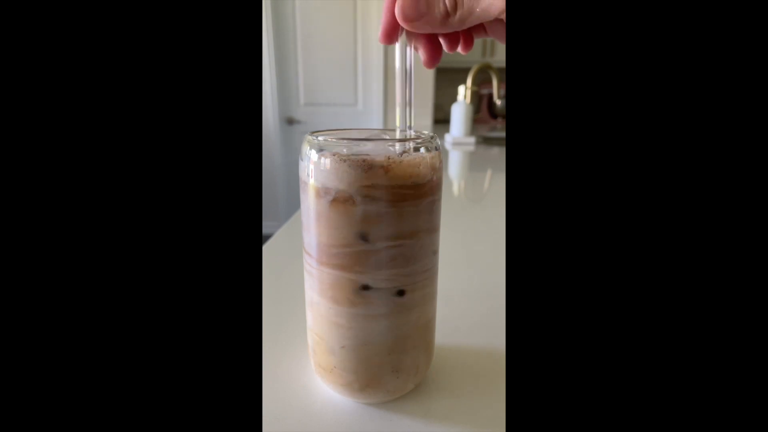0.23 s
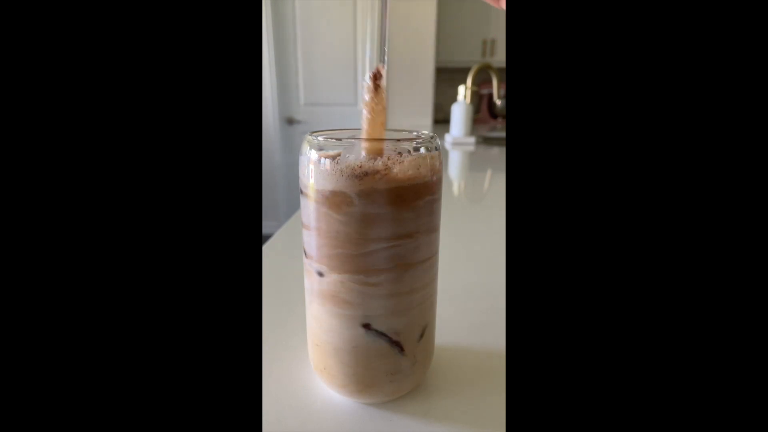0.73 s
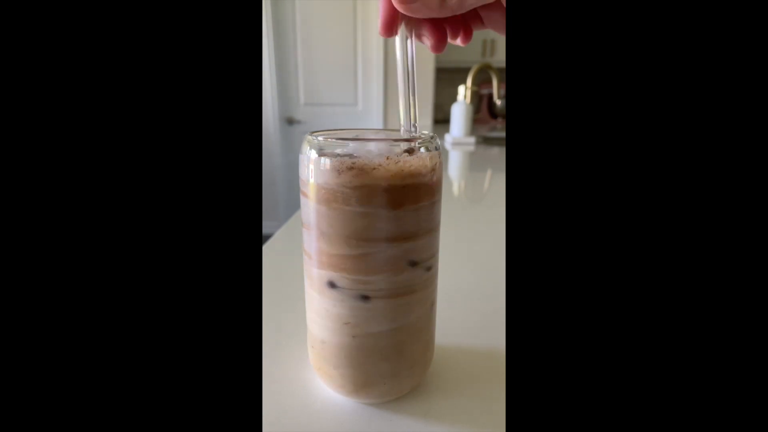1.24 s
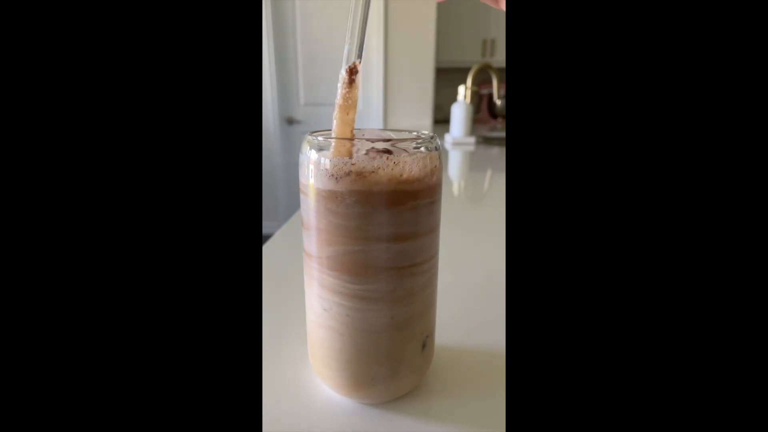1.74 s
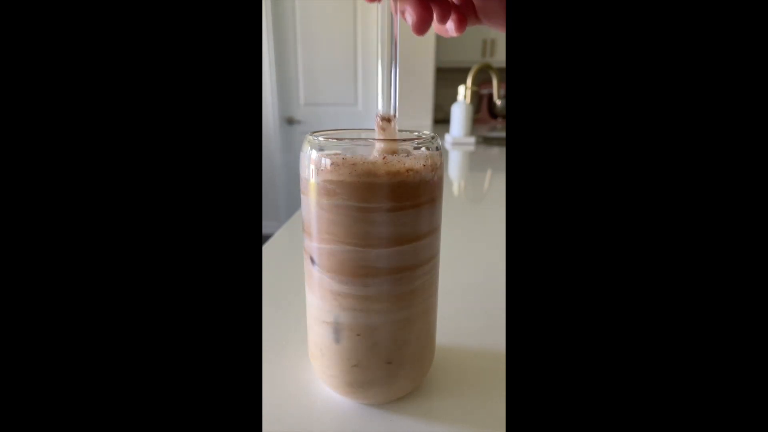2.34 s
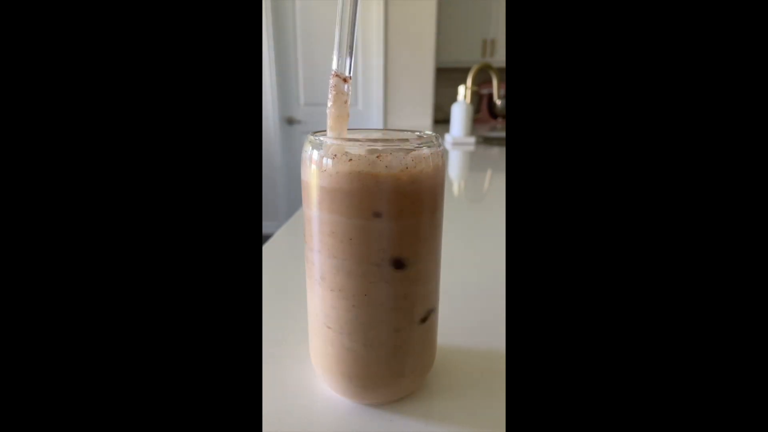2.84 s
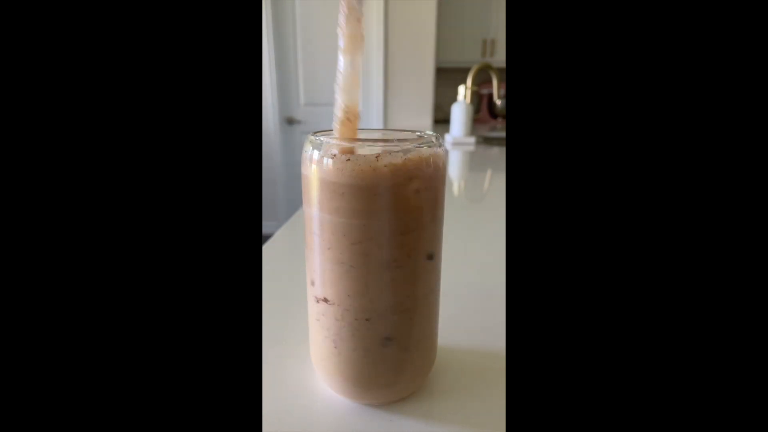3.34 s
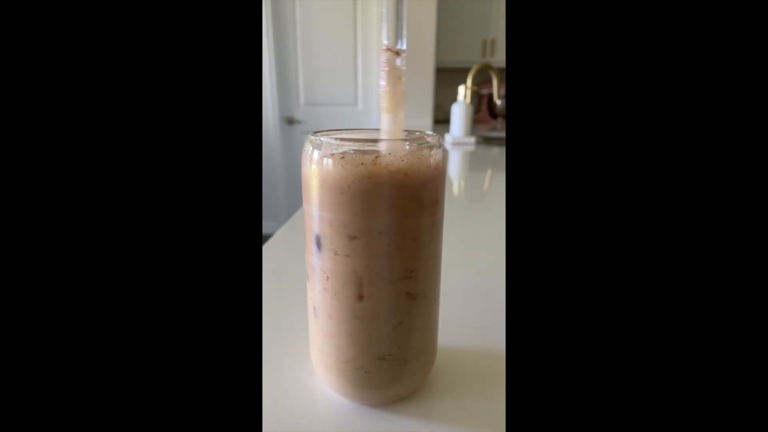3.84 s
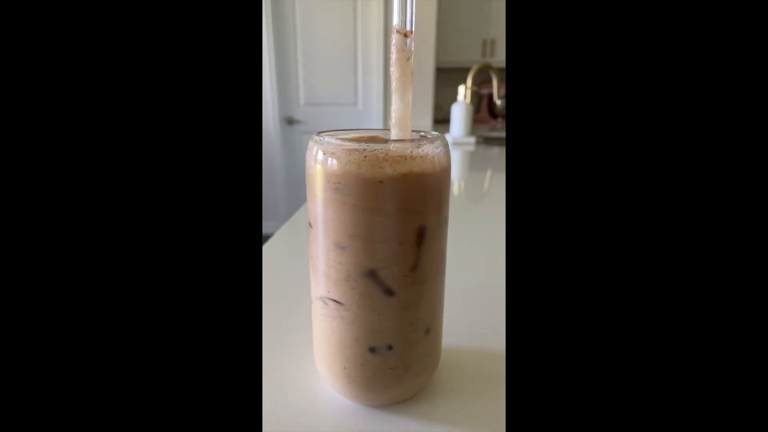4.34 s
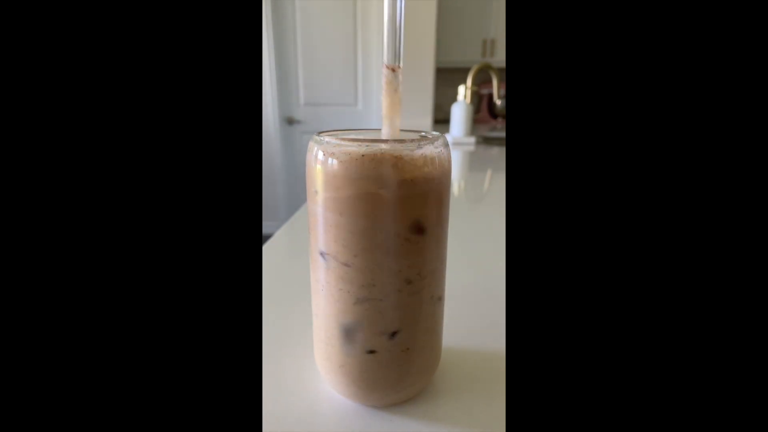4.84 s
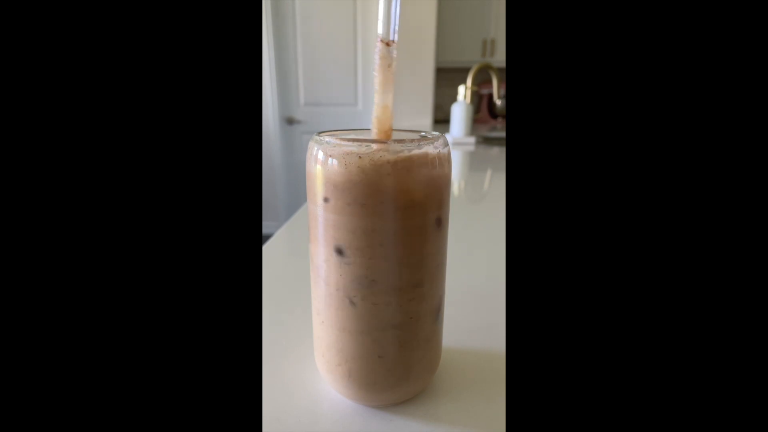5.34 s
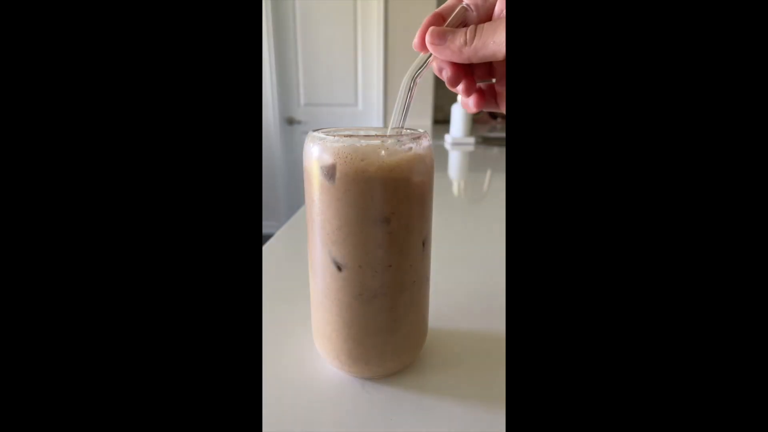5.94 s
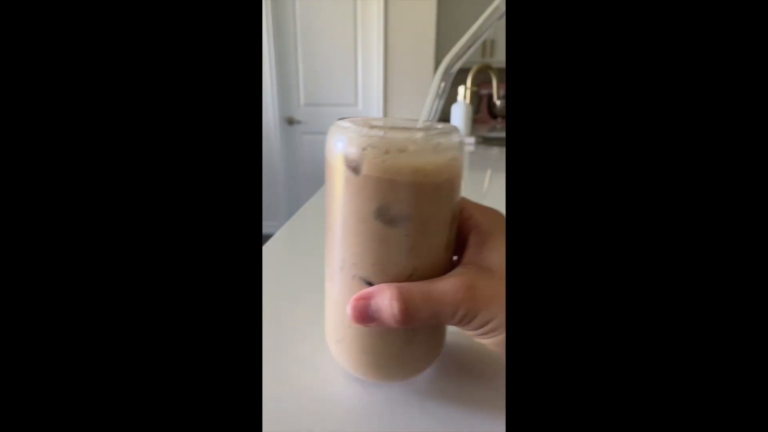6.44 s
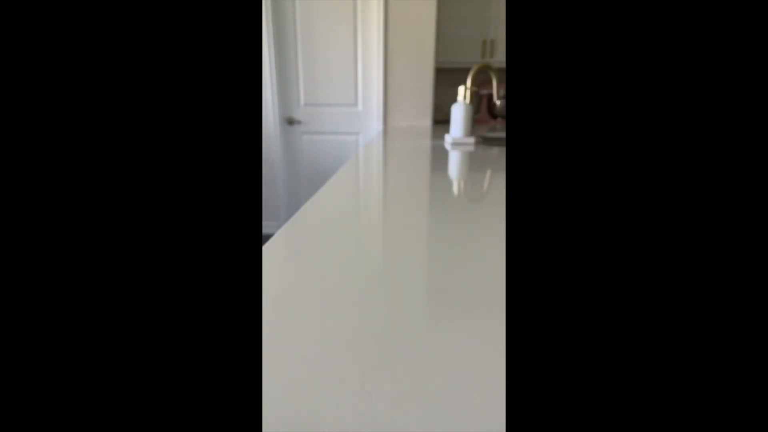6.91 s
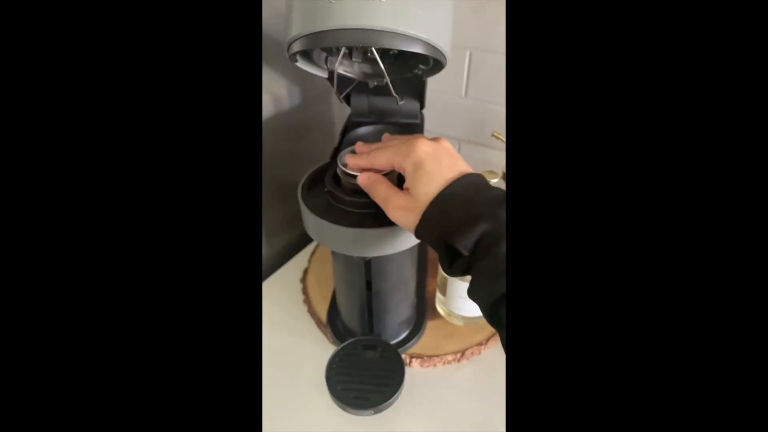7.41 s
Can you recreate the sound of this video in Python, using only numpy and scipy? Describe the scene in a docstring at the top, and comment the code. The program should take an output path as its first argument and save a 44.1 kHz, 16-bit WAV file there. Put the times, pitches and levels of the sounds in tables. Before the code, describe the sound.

Ice cubes clink busily in a full glass of iced coffee as a glass straw stirs, ending in a sharp clatter and thud, then small plastic clicks.

```python
"""Iced coffee stirred, then a capsule pressed

Close by, a glass straw stirs ice in a full glass on a stone counter, drops with a thud, and a hand lifts
the glass away. Foam and drink damp the knocks: short decaying modes, with clicks for light touches, and
brief rising tones for gulping air and for the thud. The hard kitchen behind answers with an echo of dying
noise, over a low appliance hum in filtered noise. After a silent cut a capsule is slid and pressed into a
coffee machine, heard in mono: clicks ring its hollow and rim, and a low sine is the thud of the housing."""
import sys
import numpy as np
from scipy import signal
from scipy.fft import rfft, irfft, next_fast_len
from scipy.io import wavfile
from scipy.ndimage import uniform_filter1d

SR = 44100
rng = np.random.default_rng(int(sys.argv[2]) if len(sys.argv) > 2 else 0)


def unload_audio(sound):
    """Save the sound as a 16-bit wav file, at the path given as the first command line argument."""
    columns = np.transpose(np.atleast_2d(sound))
    # keep every value between -1 and 1, then stretch to whole-number steps
    steps = np.round(np.clip(columns, -1, 1) * 32767)
    wavfile.write(sys.argv[1], SR, steps.astype(np.int16))


N = 338247

# Blows on the glass: t/s, level/dB, wall ring f/Hz, ice knock over wall ring/dB, clack over wall ring/dB
BLOWS = [(0.0748, -48, 2060, 3, -7), (0.0864, -31.5, 2440, -8.5, -0.5), (0.114, -46.5, 1940, 11, -13),
         (0.157, -52.5, 1880, 17.5, -18), (0.2425, -46, 2180, -7, -21), (0.2661, -23.5, 2050, -9.5, 2),
         (0.2723, -30.5, 2160, -7, -2.5), (0.2969, -27, 2360, -4, -5.5), (0.3179, -39, 1900, 10.5, -10),
         (0.3321, -31.5, 2150, 2, -3.5), (0.3397, -39.5, 1960, 0.5, -1.5), (0.3732, -39, 1810, 7, -8),
         (0.4979, -47.5, 2270, 6.5, -19), (0.5498, -48.5, 2130, 3.5, -13), (0.6747, -42, 2230, -1, -14),
         (0.7868, -47, 1910, 2, 3), (0.8514, -39.5, 1700, -2.5, -7), (0.859, -28.5, 2050, -12, -6),
         (0.8937, -36, 2270, -11, -8), (0.942, -37.5, 2180, -4, -14.5), (0.9599, -41, 1970, 5, -14),
         (1.0885, -37.5, 2220, -13, -14.5), (1.1336, -43.5, 2180, -2, 4), (1.1403, -52, 1850, 2.5, -9),
         (1.1576, -39.5, 2250, -22, -8), (1.2582, -34.5, 2380, -6, -12.5), (1.3296, -37.5, 2050, 7, -2.5),
         (1.34, -43.5, 2090, 7, -19), (1.5525, -49, 2050, -13, -31), (1.6379, -44, 2100, -9, -5.5),
         (1.6449, -36.5, 1920, -10, -8), (1.749, -46.5, 1720, -25, -27), (1.787, -55, 1830, -5, -16),
         (1.8216, -55, 1780, 12.5, -19), (1.9138, -49.5, 2260, 4.5, -21), (1.946, -52, 1890, 8, -12),
         (1.9578, -46.5, 2330, 3, 1), (1.9698, -48, 2160, -8, -16), (2.0845, -47, 1780, 4, -5),
         (2.0974, -47.5, 2160, 0, -3), (2.1441, -56.5, 1810, 8, 0), (2.2123, -54.5, 1900, 5.5, -5),
         (2.255, -61.5, 2400, -12.5, -10), (2.3735, -44.5, 1620, -12, -20), (2.4433, -40, 2140, -13, -16.5),
         (2.5216, -45, 2080, -6, 0.5), (2.5631, -51, 1830, 4, -2), (2.5953, -45.5, 2260, -8, -13),
         (2.7502, -46.5, 1920, 9.5, -7), (2.7996, -39, 2280, -3.5, -1), (2.8045, -36, 2150, -6, -7.5),
         (2.8407, -40.5, 1915, -6, -13), (3.0376, -33, 1830, -7, -6), (3.0879, -36, 1948, -2, -9.5),
         (3.118, -37, 1955, -4.5, -9), (3.1237, -43.5, 1848, -0.5, -17.5), (3.2209, -38, 2086, -5.5, -24.5),
         (3.2492, -40, 2090, 1.5, -3), (3.298, -42, 1908, 10, -7), (3.3502, -36, 2320, -5.5, 1.5),
         (3.3678, -14.5, 1930, -15.5, 0), (3.3832, -27.5, 2001, -6.5, -5.5),
         (3.5765, -13.5, 2237, -35.5, -10), (3.6347, -30, 2160, -15.5, -9),
         (3.6479, -22.5, 2238, -10.5, -8.5), (3.6817, -33, 1990, 2, -17), (3.6919, -30, 2070, -4.5, -12),
         (3.7322, -36.5, 1990, 3, -17), (3.7414, -44, 1940, 14, -14), (3.8146, -33, 2004, -15, -8),
         (3.8782, -28, 2000, -5.5, 0.5), (3.898, -32.5, 2040, -6, -2.5), (3.9231, -37.5, 2340, -8, -7),
         (3.9635, -20.5, 2005, -28, -7), (3.9765, -36.5, 1963, -14.5, 0), (4.1046, -22.5, 2183, -5.5, -15),
         (4.1252, -25.5, 1702, -1, -17), (4.1313, -31, 2025, 8.5, -18.5), (4.1853, -36, 2047, 2, -15.5),
         (4.2156, -36.5, 2310, -3.5, -7), (4.2303, -38.5, 2160, -1, -1), (4.3402, -34, 2160, -8, -8),
         (4.3738, -36, 2110, -10, -6.5), (4.4143, -33.5, 2404, -9, -8), (4.4778, -28.5, 2190, -15.5, 2),
         (4.5076, -32, 2230, -4.5, -14.5), (4.5298, -35.5, 2130, -2, -6), (4.548, -25, 1925, -5.5, -17.5),
         (4.6094, -16.5, 1986, -26.5, 3), (4.6226, -28, 2050, -34, -35), (4.6637, -26, 2350, -19.5, -27),
         (4.8168, -29, 2360, -6, -1.5), (4.8353, -36.5, 2030, -7, 2.5), (4.8697, -40, 2070, -0.5, -12),
         (4.9273, -31.5, 2140, -6, -17.5), (4.9721, -38.5, 2210, -0.5, -5),
         (5.0528, -30.5, 2070, -12, -15.5), (5.1239, -34.5, 1980, -2, -5), (5.1602, -32.5, 2010, 3.5, 9.5),
         (5.1667, -37, 2050, -5, 3), (5.1762, -39, 1990, 6.5, -1), (5.2751, -47.5, 2210, -8.5, 12),
         (5.347, -43.5, 2140, -3.5, -10), (5.4003, -32.5, 1887, 5, -6), (5.4142, -16.5, 2155, -23, -5.5),
         (5.4207, -29.5, 2048, -6, -2.5), (5.47, -16.5, 2040, -9, -15.5), (5.5298, -17, 1800, -9.5, -10.5),
         (5.5387, -25.5, 2133, -15, -22), (5.5544, -8, 2010, -10.5, -7), (5.558, -11.5, 2170, -18.5, -8),
         (5.561, -15, 2150, -14, -10), (5.5703, -18, 2180, -14, -12), (5.5744, -17.5, 2254, -13, -11.5),
         (5.5987, -18.5, 2270, -15.5, -2), (5.6044, -25.5, 2130, -16, -4), (5.6078, -32, 2220, -15.5, 8),
         (5.611, -19, 2190, -8.5, -11), (5.614, -21, 2125, -11.5, -12), (5.622, -32, 2120, -5.5, -6),
         (5.669, -31.5, 2300, -7.5, -9), (5.6892, -29, 2210, -6.5, 7), (5.6927, -17.5, 2365, -6.5, -8),
         (5.6972, -23, 2075, -5, -3), (5.7125, -20, 2120, 4.5, 6.5), (5.7567, -28, 2160, -5, -8.5),
         (5.77, -31, 2020, 2.5, 11.5), (5.7759, -13, 2217, -19, -0.5), (5.8608, -32, 1924, -5.5, -28),
         (5.8759, -36, 1975, 1, -19), (5.9797, -30.5, 2240, 0, -24), (6.0349, -37.5, 1940, -5, -22),
         (6.1174, -35.5, 2090, -8.5, -20), (6.351, -45, 2050, 12.5, -26), (6.4119, -45, 2150, 1.5, -29.5),
         (6.4953, -46.5, 2070, 1, -7.5), (6.7166, -47.5, 2050, 1, -0.5)]
# Modes of the full glass, low knock, middle clack and high glint: f/Hz, relative level/dB, t60/s
KNOCK_MODES = [(345, -25.5, 0.024), (525, -19, 0.017), (740, -14.5, 0.019), (1008, -5.5, 0.0075),
               (1230, -4, 0.0034)]
CLACK_MODES = [(2926, -8, 0.0094), (3670, -8, 0.0098), (4080, -11.5, 0.0086), (5090, -11, 0.013),
               (5310, -6.5, 0.0064), (6270, -9.5, 0.0041)]
GLINT_MODES = [(9300, -3.5, 0.0053), (9230, -5.5, 0.0037), (11050, -8.5, 0.0046), (12400, -8, 0.017)]
WALL_T60_S, MODE_SCATTER_DB, DETUNE = 0.0053, 3, 0.069  # DETUNE is a fraction of the mode's pitch
# Swell of a hard blow, and dB of longer contact per dB of ice knock
CONTACT_S, SOFTENING = .0007, .55
# The echo is fed a broad crack: modes cut short, and a snap
CRACK_T60_S, CRACK_DB, SNAP_DB = .0016, 10, -2
# Glint over the clack at a firm blow, its rise in dB per dB of force, and its chance
GLINT_DB, GLINT_PER_DB, FIRM_BLOW_DB, GLINT_SCATTER_DB = -14.5, 0.3347, -32, 0.5

# Stirring, then the glass carried off: t/s, ice jostling level/dB, drink slosh level/dB
STIR = [(0.0, -79, -72.5), (0.32, -66, -53.5), (0.65, -72, -67.5), (1.04, -69, -66), (2.51, -76, -68),
        (2.65, -62, -72.5), (3.11, -66, -73), (3.28, -59, -71), (3.82, -58.5, -68), (3.94, -65.5, -69),
        (4.44, -55.5, -65.5), (4.61, -66, -66), (5.17, -62.5, -69), (5.46, -60, -68.5), (5.62, -40, -61.5),
        (5.72, -52, -53.5), (5.98, -55.5, -61.5), (6.13, -59.5, -60)]
LIFT = [(6.16, -95, -79), (6.6, -93, -75), (6.892, -93, -79), (6.92, -93, -79)]
# Cubes tumbling in a dense rattle: t/s, length/s, level/dB
RATTLES = [(0.104, 0.022, -56), (0.142, 0.024, -53), (0.294, .1, -60), (0.367, 0.022, -53.5),
           (0.895, 0.0096, -53), (1.1, 0.016, -53), (1.135, .015, -49), (1.312, 0.074, -52.5),
           (1.85, 0.024, -63.5), (2.063, .015, -59.5), (2.086, 0.027, -57), (2.141, 0.047, -60),
           (2.201, 0.034, -65), (2.553, 0.065, -54), (2.792, 0.021, -52), (3.375, 0.023, -40),
           (3.878, 0.036, -39.5), (4.1, 0.038, -35.5), (4.536, 0.036, -41), (5.404, 0.027, -41.5),
           (5.463, 0.023, -47.5), (5.558, .012, -26), (5.568, 0.019, -32.5), (5.595, 0.043, -33),
           (5.705, 0.022, -31.5), (5.754, 0.055, -26.5), (6.33, 0.097, -61)]
# Air pockets gulping in the drink; the two near 344 Hz at 5.7-5.8 s are the thud of the dropped straw:
# t/s, level/dB, starting f/Hz
GULPS_AND_STRAW_THUD = [(0.085, -34, 490), (0.265, -45, 630), (0.363, -34.5, 404), (0.519, -37.5, 430),
                        (1.32, -32.5, 475), (2.07, -48, 450), (2.2, -50, 400), (2.318, -50, 338),
                        (3.295, -39, 674), (3.366, -37, 600), (3.69, -36, 398), (3.876, -43, 395),
                        (4.103, -40, 630), (4.606, -30, 637), (4.815, -44, 600), (4.941, -40.5, 410),
                        (5.398, -39, 505), (5.47, -31, 560), (5.532, -33, 640), (5.708, -17, 343),
                        (5.761, -27, 345), (5.999, -31.5, 633)]
JOSTLES_PER_S, TUMBLES_PER_S, GURGLES_PER_S = 600, 1500, 200
# Cycles, at the starting pitch, in which a gurgle, or a gulp or thud, dies by 60 dB; its phase bend
GURGLE_CYCLES, GULP_CYCLES, GULP_RISE = 7, 13, 0.19
SURGES_PER_S, JOSTLE_SURGE_DB, SLOSH_SURGE_DB = 14, 2.5, 1.5  # ice and drink move in fits and starts
# Each blow shakes the cubes: level against the blow, dying time, delay
JOLT_DB, JOLT_T60_S, JOLT_DELAY_S = -25, 0.068, 0.0035

# Capsule scrapes and crunches: t/s, length/s, relative level/dB, rim clicks over hollow clicks/dB
CAPSULE = [(7.27, 0.073, -62, -6), (7.283, 0.039, -47.5, -10), (7.302, 0.16, -62, 0.5),
           (7.374, 0.018, -49.5, 11.5), (7.382, 0.072, -49, -19), (7.448, 0.0096, -34, 12.5),
           (7.456, 0.083, -60, -5)]
# Capsule knocks into its seat: t/s, relative level/dB
SEATING = [(7.3762, -32), (7.379, -15), (7.385, -24)]
# Modes of the hollow capsule, then of its hard rim: f/Hz, relative level/dB, t60/s
HOLLOW_MODES = [(334, -32, 0.0092), (503, -20, 0.0062), (1150, -45, 0.031), (1320, 1.5, 0.015),
                (1720, 0, 0.0085)]
RIM_MODES = [(2700, -3, .005), (3600, 0, .006), (4300, -2, .005), (5400, -6, .004), (6600, -8, .004),
             (8000, -12, .004)]
# Housing thuds: t/s, level/dB, t60/s
THUDS = [(7.384, -44.5, 0.49), (7.412, -41, 0.14), (7.456, -28.5, 0.092), (7.505, -38, 0.09)]
THUD_HZ = 69.2

# Echo of the kitchen, then of the nook around the machine: f/Hz, relative level/dB, t60/s
KITCHEN = [(205, -16, 0.37), (570, -22, 0.62), (1440, -20.5, 0.22), (3180, -29, 0.45), (6000, -28.5, 0.21),
           (6760, -47.5, 0.66), (8300, -40, .4), (8800, -36, .35), (11000, -27.5, 0.3)]
NOOK = [(201, 5.5, 0.14), (600, -25, 0.27), (1500, -26, 0.45), (4000, -23, 0.33), (7860, -32, 0.34),
        (10000, -32, 0.19)]
# Diffuse sound: f/Hz, side minus mid level/dB
WIDTH = [(60, -31), (130, -25), (270, -10.5), (580, -0.5), (1230, -6.5), (2610, -8), (5560, -3),
         (11800, -5.5)]
# Direct sound at the two microphone ports: f/Hz, phase by which left leads/rad
PORT_LEAD = [(0, 0), (1000, .18), (2000, .42), (4000, .85), (8000, 1.9), (12000, 1.0)]
# Colour of the kitchen air: f/Hz, relative level/dB
AIR_COLOUR = [(15, -41), (25, -30.5), (43, -6.5), (91, -1), (124, -2.5), (183, -11), (231, -10.5),
              (451, -36.5), (718, -34.5), (1730, -41.5), (12000, -54.5), (15600, -92), (22000, -120)]
# Lumps of mains hum added to that colour: f/Hz, width/Hz, relative level/dB
HUM = [(62, 10, 1.5), (122, 6.2, -6.5)]
# Loudness of the kitchen air: t/s, level/dB
AIR_LEVEL = [(0.0, -60), (0.39, -59), (0.68, -62), (3.14, -65.5), (3.52, -60), (5.88, -60.5), (6.89, -65),
             (6.95, -68.5)]
# A faint far tone: t/s, f/Hz, level/dB
DRONE = [(3.75, 142.6, -66.5), (4.046, 165.2, -68), (5.078, 160.9, -62.5), (5.3, 164.7, -86)]
NOOK_AIR_DB = -77.5
# Shots, three of the glass and one of the machine: start t/s, end t/s
SHOTS = [(0, 5.487), (5.487, 6.146), (6.146, 7.056), (7.269, 7.67)]

DUCK_FROM_DB, DUCK_SHARE, DUCK_ATTACK_S, RECOVERY_DB_PER_S = -42.5, 0.2, 0.024, 49.5
CUTOFF_HZ = 12600


def strike(blows):
    """Each blow swells over its contact and rings the wall and all mode families; also gives the cracks."""
    at, blow_db, wall_hz, *family_db = np.transpose(blows)[:, :, None]
    # a harder blow reaches the highest modes
    force_db = GLINT_PER_DB * (blow_db - FIRM_BLOW_DB)
    force_db = force_db + GLINT_SCATTER_DB * rng.standard_normal((len(blows), 1))
    family_db.append(family_db[1] + GLINT_DB + force_db)
    lead = 400  # samples kept ahead of the full contact
    t = (np.arange(1600) - lead) / SR
    age = np.maximum(t, 0)
    chance = rng.standard_normal((len(blows), 3, 20))
    sound = np.sin(2 * np.pi * wall_hz * t) * from_db(-60 * age / WALL_T60_S)
    families = zip((KNOCK_MODES, CLACK_MODES, GLINT_MODES), family_db)
    modes = [(*mode, share_db) for family, share_db in families for mode in family]
    for k, (hz, level_db, t60, share_db) in enumerate(modes):
        detune, scatter, phase = np.clip(chance[:, :, [k]], -2, 2).transpose(1, 0, 2)
        # the spot struck and the ice against the wall shift each mode
        hz = hz * (1 + DETUNE * detune)
        gain = from_db(share_db + level_db + MODE_SCATTER_DB * scatter - 60 * age / t60)
        sound = sound + gain * np.sin(2 * np.pi * hz * t + np.pi * phase)
    crack = sound * from_db(CRACK_DB - 60 * np.abs(t) / CRACK_T60_S) + from_db(SNAP_DB) * (t == 0)
    # ice on ice is dull and lands softly
    contact = CONTACT_S * from_db(SOFTENING * np.clip(family_db[0] - 2.0, 0, 20))
    sound = sound * from_db(2.0) * np.exp(-(np.minimum(t, 0) / contact) ** 2)
    out = np.zeros((2, N + len(t)))
    place = (at * SR).astype(int) + 15 - lead + np.arange(len(t))
    for track, part in zip(out, (sound, crack)):
        np.add.at(track, place, part * from_db(blow_db))
    return out[:, :N]


def stirring():
    """Ice jostles and tumbles on the glass, the drink gurgles and gulps, and the dropped straw thuds."""
    jostle_db, slosh_db = in_time(STIR + LIFT)
    jostle_db = jostle_db + JOSTLE_SURGE_DB * surges()
    slosh_db = slosh_db + SLOSH_SURGE_DB * surges()
    tumble = sum(from_db(db) * swell(s, length) for s, length, db in RATTLES)
    slosh = gurgle()
    jostle = rms_one(touches(grains(JOSTLES_PER_S, 4.8)))
    rattle = rms_one(touches(grains(TUMBLES_PER_S, 2.3)))
    ice = from_db(jostle_db) * jostle + (tumble + jolts()) * rattle
    return ice + from_db(slosh_db) * slosh + gulps_and_straw_thud()


def touches(clicks):
    """Light touches of ice, each mode of the glass struck with its own strength."""
    modes = [(1630, -1.0, 0.0096), (2050, -4.0, 0.0048), (2480, 1.5, .007)]  # wall: Hz, dB, t60 s
    for family, offset_db in ((KNOCK_MODES, -6), (CLACK_MODES, -10), (GLINT_MODES, -19)):
        modes += [(hz, db + offset_db, t60) for hz, db, t60 in family]
    rings = sum(from_db(db) * ring(clicks * rng.standard_normal(N), hz, t60) for hz, db, t60 in modes)
    return signal.lfilter([.15], [1, -.6], rings)  # a soft contact is dull


def jolts():
    """After every blow the cubes tremble against the wall for a moment: a decaying envelope."""
    kicks = np.zeros(N)
    for s, blow_db, *_ in BLOWS:
        kicks[int((s + JOLT_DELAY_S) * SR)] = from_db(blow_db + JOLT_DB)
    return signal.lfilter([1], [1, -from_db(-60 / (JOLT_T60_S * SR))], kicks + 1e-18)


def gurgle():
    """The drink around the cubes: random pops dealt among fourteen bubble pitches."""
    pops = grains(GURGLES_PER_S, 4.5)
    dealt = rng.integers(0, 14, N)
    pitches = np.geomspace(230, 1300, 14)
    bubbles = sum(ring(pops * (dealt == k), hz, GURGLE_CYCLES / hz) for k, hz in enumerate(pitches))
    return rms_one(signal.lfilter([.2], [1, -.8], bubbles))


def gulps_and_straw_thud():
    """Air pockets ring a few cycles, rising as they near the surface; the straw's thud is made alike."""
    out, t = np.zeros(N), np.arange(4000) / SR
    for s, level_db, hz in GULPS_AND_STRAW_THUD:
        cycles = hz * t
        bent = cycles * (1 + GULP_RISE * cycles / GULP_CYCLES)
        tone = np.sin(2 * np.pi * bent) * np.minimum(cycles / 2.0, 1)
        out[int(s * SR):][:len(t)] += from_db(level_db - 60 * cycles / GULP_CYCLES) * tone
    return out


def surges():
    """Slow chance of spread 1, held within 2 either way."""
    r = np.exp(-2 * np.pi * SURGES_PER_S / SR)
    slow = signal.lfilter([1], [1, -2 * r, r * r], rng.standard_normal(N + SR))[SR:]
    return np.clip(rms_one(slow), -2, 2)


def capsule():
    """Bursts of clicks and soft knocks ring the hollow capsule and its hard rim; also gives the echo feed."""
    clicks = rms_one(grains(5600, 3.2))
    soft, hard = np.zeros((2, N))
    for s, length, level_db, hard_db in CAPSULE:
        burst = clicks * swell(s, length) * from_db(level_db - 15.5)
        soft += burst
        hard += burst * from_db(hard_db)
    hollow = sum(from_db(db) * ring(soft, hz, t60) for hz, db, t60 in HOLLOW_MODES)
    rim = sum(from_db(db) * ring(hard, hz, t60) for hz, db, t60 in RIM_MODES)
    # the echo is fed a rim with its own ringing time, set louder
    crack = sum(from_db(db + 3.5) * ring(hard, hz, CRACK_T60_S) for hz, db, _ in RIM_MODES)
    small_body = signal.butter(6, [300, 8500], "band", fs=SR, output="sos")  # a small thing gives no bass
    return signal.sosfilt(small_body, [hollow + rim, hollow + crack]) + seat_knocks()


def seat_knocks():
    """The capsule knocks into its seat: each soft contact sets the hollow modes ringing."""
    knocks = np.zeros(N)
    for s, level_db in SEATING:
        age = np.maximum(np.arange(N) / SR - s, 0)
        onset = 1 - np.exp(-(age / 0.001) ** 2)
        rings = sum(from_db(db - 60 * age / t60) * np.sin(2 * np.pi * hz * age)
                    for hz, db, t60 in HOLLOW_MODES)
        knocks += from_db(level_db + 8.0) * onset * rings
    return knocks


def housing_thuds():
    """The machine housing thuds: a low sine with a short rise and a decay."""
    thud = np.zeros(N)
    for s, level_db, t60 in THUDS:
        age = np.maximum(np.arange(N) / SR - s, 0)
        tone = np.sin(2 * np.pi * THUD_HZ * age) * np.minimum(age / 0.0041, 1)
        thud += from_db(level_db - 60 * age / t60) * tone
    return thud


def ports(x):
    """Two microphone ports hear the glass with a frequency-dependent phase lead on the left."""
    size = next_fast_len(N)
    lead = at_hz(PORT_LEAD, np.fft.rfftfreq(size, 1 / SR)) * np.array([[.5], [-.5]])
    return irfft(rfft(x, size) * np.exp(1j * lead), size)[:, :N] * from_db([[-.3], [.3]])


def echo(x, walls):
    """Echo of hard walls: noise dying band by band, fading in over a few ms."""
    size = SR
    hz, t = np.fft.rfftfreq(size, 1 / SR), np.arange(size) / SR
    centres = np.geomspace(100, 12800, 8)
    noise = diffuse(size) * from_db(at_hz(walls, hz))
    tail = 0
    for k, centre in enumerate(centres):
        share = np.interp(np.log(hz + 1), np.log(centres), np.arange(8) == k)
        band = irfft(noise * share, size)
        tail = tail + band * from_db(-60 * t / at_hz(walls, centre, axis=2))
    tail = tail * from_db(-16) * np.clip(t / 0.0037, 0, 1)
    return signal.fftconvolve(x[None], tail, axes=1)[:, :N]


def air():
    """Steady kitchen air with a lumpy mains hum, and a far tone that comes and goes."""
    size = next_fast_len(N)
    bins = np.fft.rfftfreq(size, 1 / SR)
    lumps = sum(from_db(db) / (1 + (2 * (bins - hz) / width) ** 2) for hz, width, db in HUM)
    colour = from_db(at_hz(AIR_COLOUR, bins)) + lumps
    noise = irfft(diffuse(size) * colour, size)[:, :N]
    # the tone fades in and out over 0.1 s
    (first_s, first_hz, _), (last_s, last_hz, _) = DRONE[0], DRONE[-1]
    hz, level_db = in_time([(first_s - .1, first_hz, -100)] + DRONE + [(last_s + .1, last_hz, -100)])
    tone = from_db(level_db) * np.sqrt(2) * np.sin(2 * np.pi * np.cumsum(hz) / SR)
    return rms_one(noise), tone


def diffuse(size):
    """Spectra of left and right noise, as wide as WIDTH says."""
    mid, side = rfft(rng.standard_normal((2, size)))
    side = from_db(at_hz(WIDTH, np.fft.rfftfreq(size, 1 / SR))) * side
    return mid + side * [[1], [-1]]


def grains(per_s, spread_db):
    """Random clicks of uneven size and sign."""
    sizes = from_db(spread_db * np.minimum(rng.exponential(1, N), 5)) * rng.choice([-1, 1], N)
    return sizes * (rng.random(N) < per_s / SR)


def ring(clicks, hz, t60):
    """A two-pole resonator: a unit click sets a decaying sine ringing from height 1."""
    r, w = from_db(-60 / (t60 * SR)), 2 * np.pi * hz / SR
    return signal.lfilter([0, np.sin(w)], [1, -2 * r * np.cos(w), r * r], clicks + 1e-18)


def swell(s, length):
    """A bump that rises fast and falls slowly."""
    return np.sin(np.pi * np.clip((np.arange(N) / SR - s) / length, 0, 1) ** .6)


def from_db(db):
    """dB to gain."""
    return 10 ** (np.asarray(db) / 20)


def rms_one(x):
    """Scale to rms 1."""
    return x / np.sqrt(np.mean(x ** 2) + 1e-20)


def in_time(rows):
    """Columns of a curve, sample by sample."""
    s, *columns = np.transpose(rows)
    return [np.interp(np.arange(N) / SR, s, c) for c in columns]


def at_hz(points, hz, axis=1):
    """Read a table on a log-frequency axis."""
    table = np.array(points, float)
    return np.interp(np.log(hz + 1), np.log(table[:, 0] + 1), table[:, axis])


def shot(order):
    """Gate of one shot, with 3 ms fades."""
    start, end = SHOTS[order]
    t = np.arange(N) / SR
    return np.clip(np.minimum(t - start + .003, end + .003 - t) / .003, 0, 1)


def scene():
    """Three shots of the glass in the kitchen and one of the machine; echoes stop at each cut."""
    blows, cracks = strike(BLOWS)
    stirred = stirring()
    hum, tone = air()
    bed = ports(blows + stirred) + from_db(in_time(AIR_LEVEL)[0]) * hum + tone
    out = np.zeros((2, N))
    for k in range(3):
        gate = shot(order=k)
        out += gate * (bed + echo((cracks + stirred) * gate, KITCHEN))
    contacts, echo_feed = capsule()
    # one channel of echo and air keeps the machine mono
    nook = contacts + housing_thuds() + echo(echo_feed, NOOK)[0] + from_db(NOOK_AIR_DB) * hum[0]
    return out + shot(order=3) * nook


def record(dry):
    """Gain control ducks just after loud blows and recovers at a steady rate; the top is cut."""
    level_db = 10 * np.log10(uniform_filter1d(np.mean(dry ** 2, axis=0), size=200) + 1e-12)
    ramp = RECOVERY_DB_PER_S * np.arange(N) / SR
    wanted_db = DUCK_SHARE * np.maximum(level_db - DUCK_FROM_DB, 0)
    duck_db = np.maximum.accumulate(wanted_db + ramp) - ramp
    r = np.exp(-1 / (DUCK_ATTACK_S * SR))
    ducked = dry * from_db(-signal.lfilter([1 - r], [1, -r], duck_db))
    return signal.sosfilt(signal.cheby2(12, 60, CUTOFF_HZ, fs=SR, output="sos"), ducked)


dry = scene()
out = record(dry)
unload_audio(out)
```